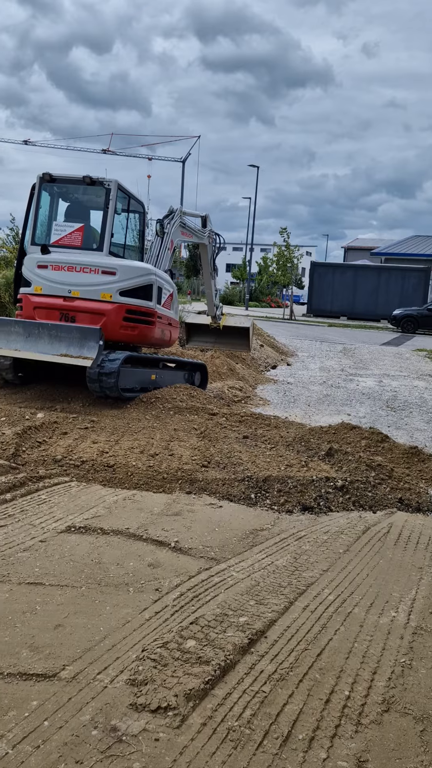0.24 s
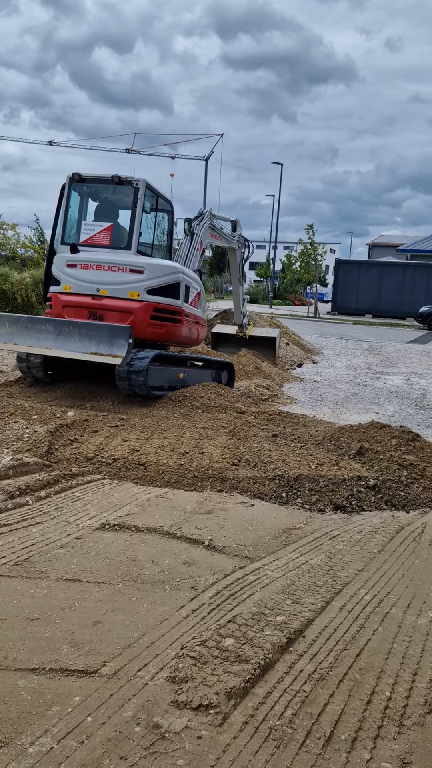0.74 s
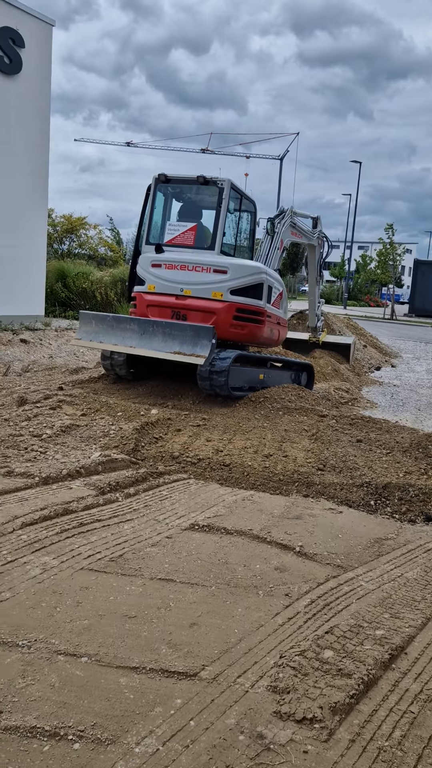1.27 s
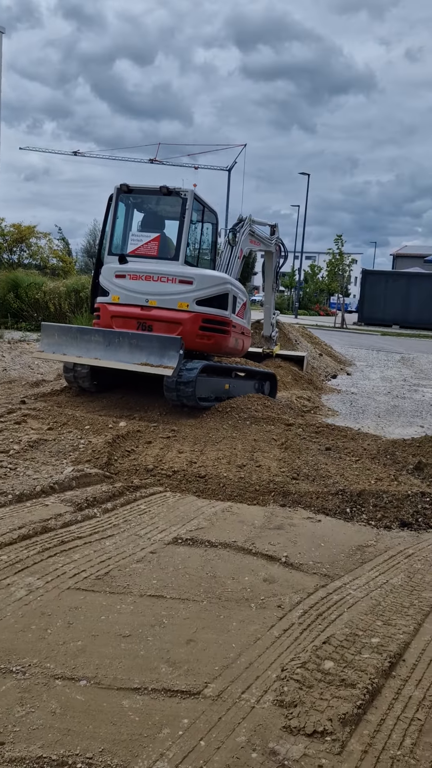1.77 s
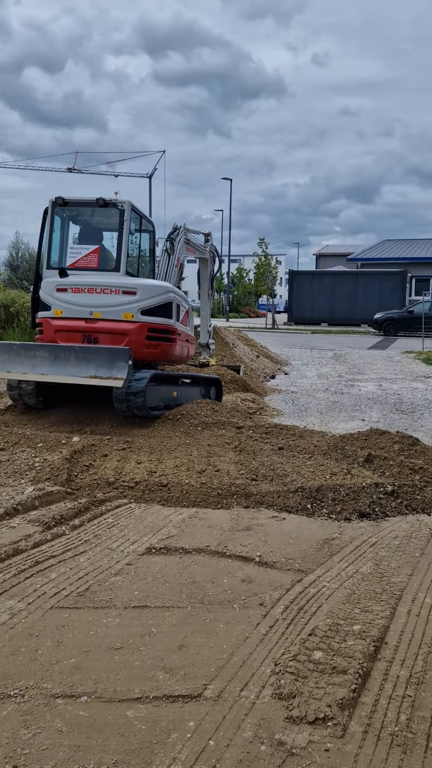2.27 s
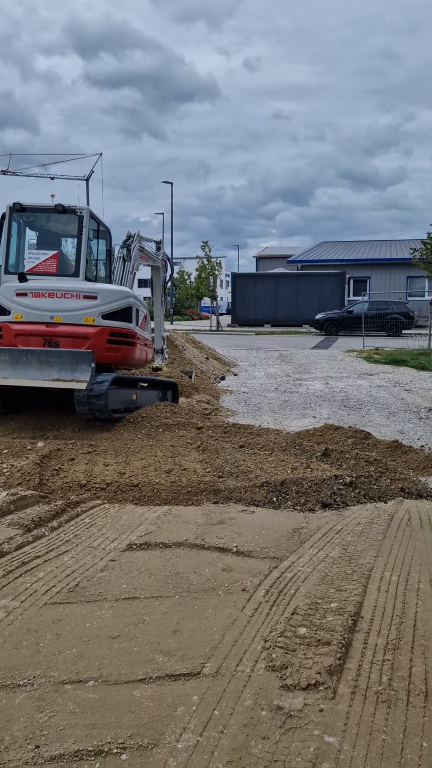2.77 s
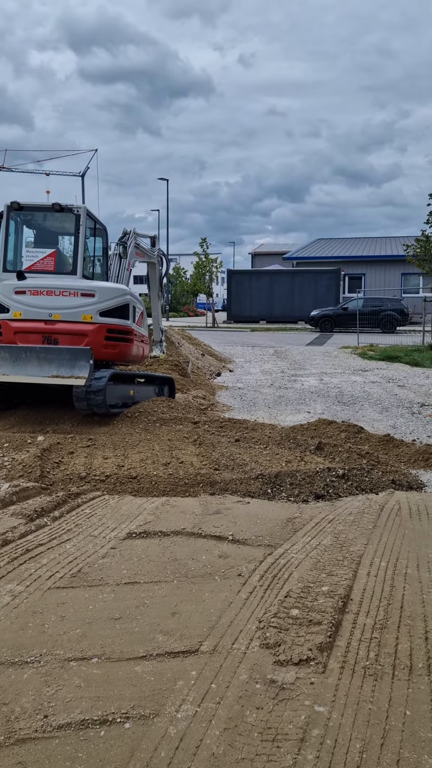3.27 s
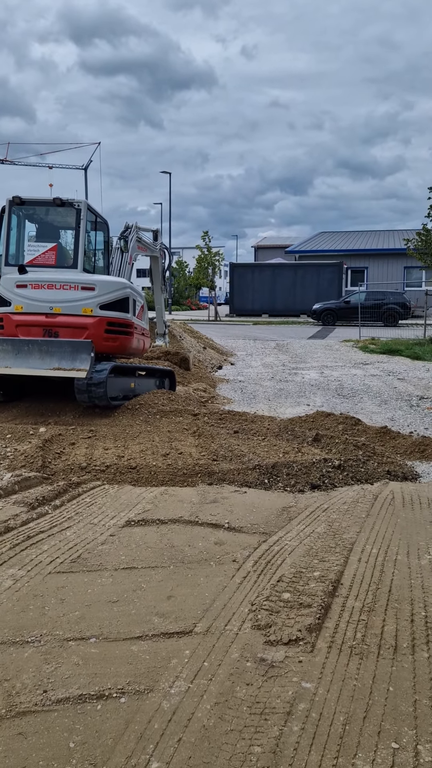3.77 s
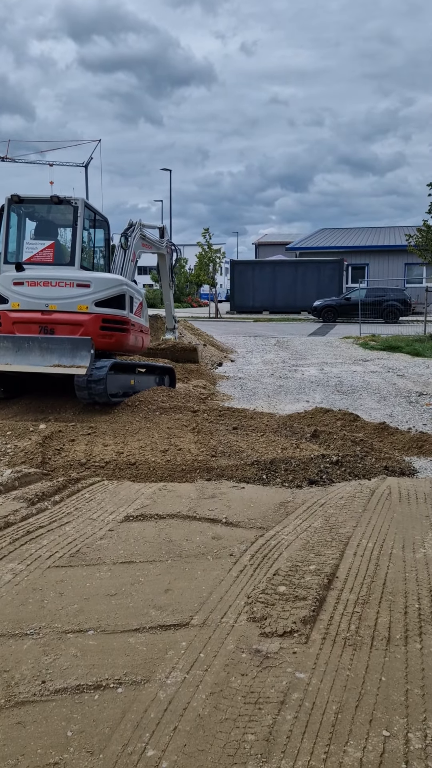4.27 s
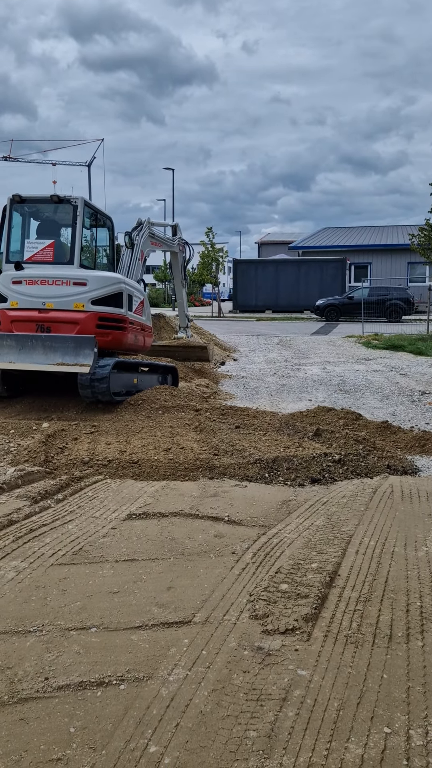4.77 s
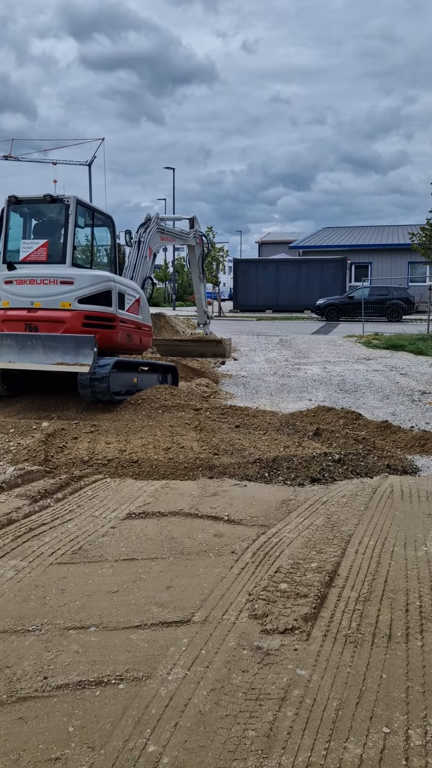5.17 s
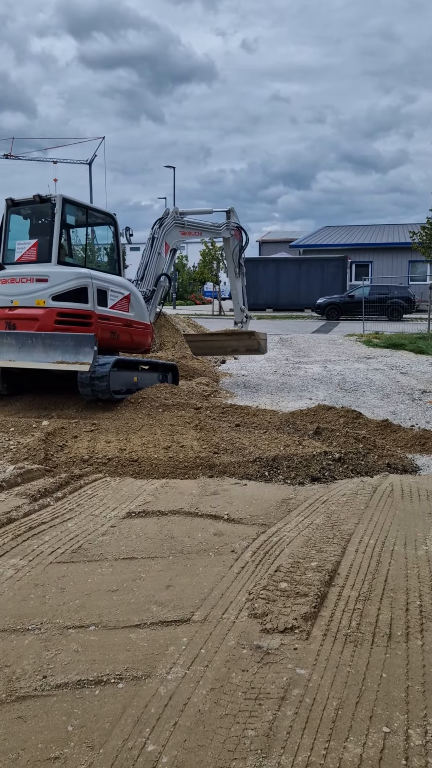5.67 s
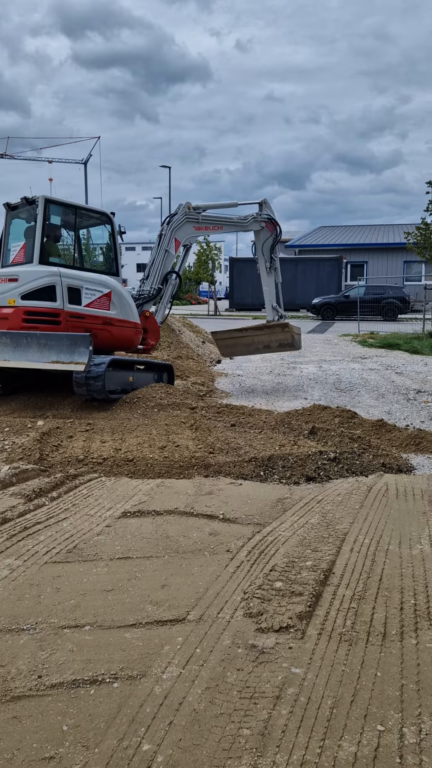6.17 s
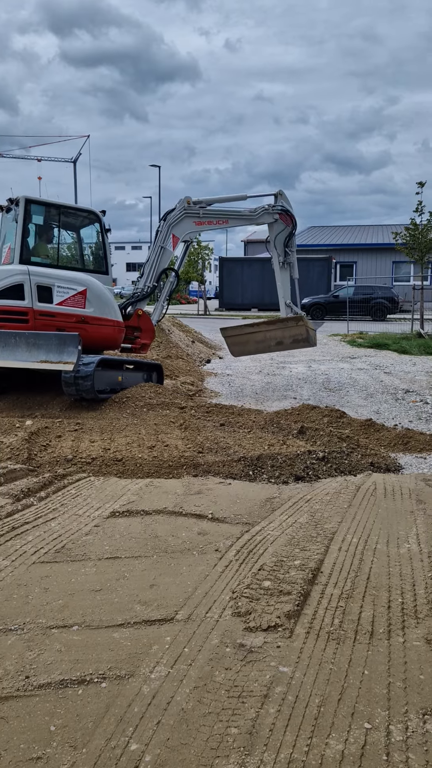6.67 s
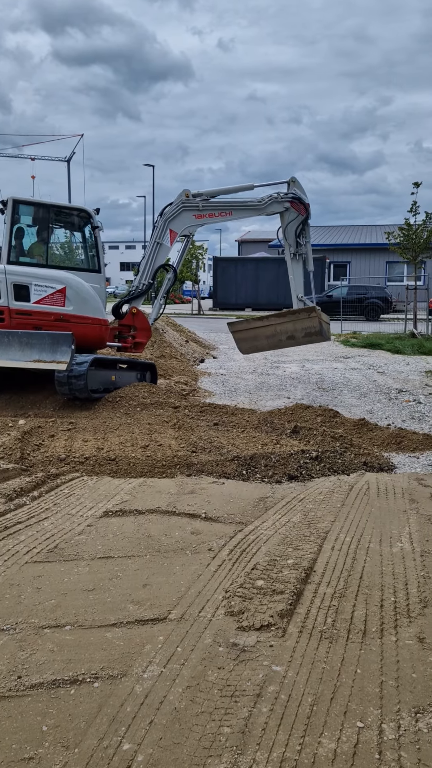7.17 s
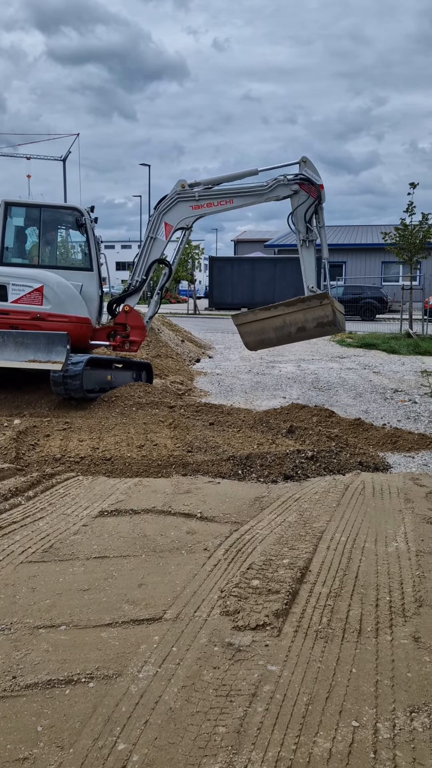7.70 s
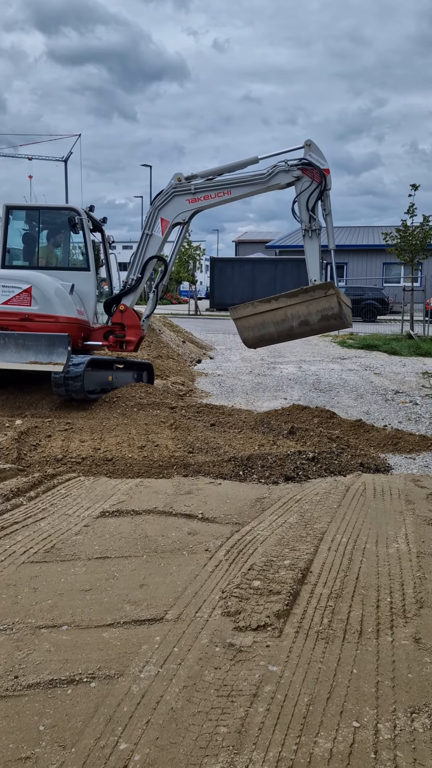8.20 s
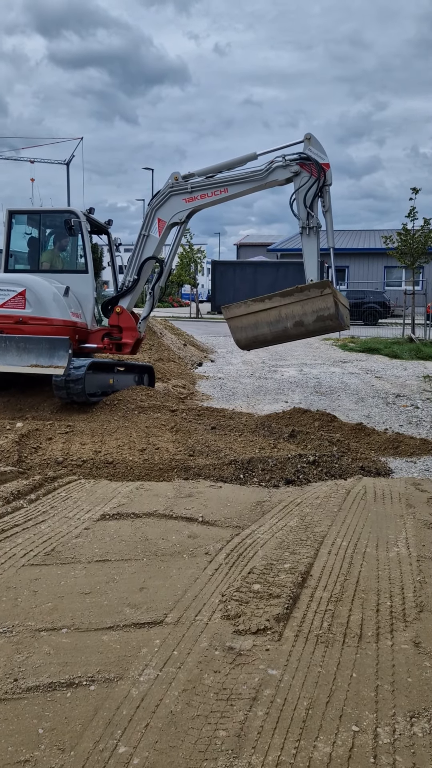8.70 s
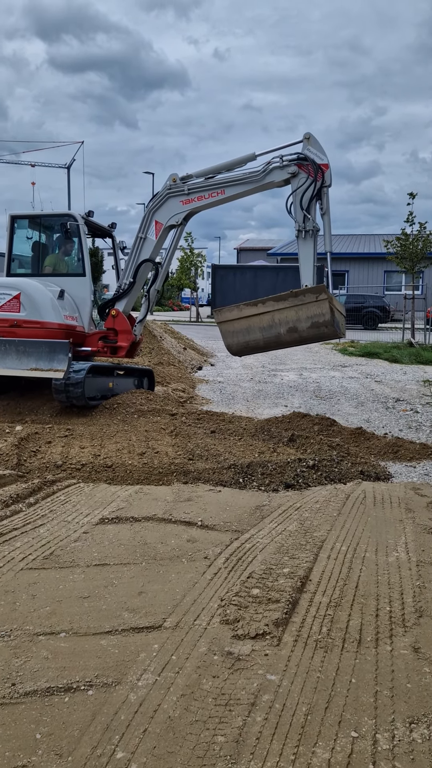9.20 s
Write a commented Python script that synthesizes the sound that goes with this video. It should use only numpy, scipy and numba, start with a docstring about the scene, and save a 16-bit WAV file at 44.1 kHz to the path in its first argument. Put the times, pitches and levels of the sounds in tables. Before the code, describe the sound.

Continuous low diesel drone with dense mechanical clatter and airy hiss, picked up outdoors by a nearby phone. During the first half the boom wavers and drops out briefly while the arm digs, with grinding, gritty rustle, soft thuds and gusts at the microphone. One damped metallic knock ends the digging. Then the boom runs smoother with panel hum and hydraulic hiss as the loaded bucket lifts and swings, growing a little duller at the end.

```python
"""The exhaust boom of a mini excavator's diesel fades and swells throughout, a few metres from a phone on a building site.
Tones locked to the four-cylinder firing count make boom, panel hum and fan; noise pulsed by it makes rumble and clatter.
Oil hisses in narrow noise bands, sandy noise grains rustle, and decaying modes ring in one bucket knock.
The engine bay grows duller and quieter as the machine slews away near the end; low noise buffets the two microphone ports as wind."""
import sys
import numpy as np
from scipy import signal
from scipy.fft import rfft, irfft, next_fast_len
from scipy.io import wavfile
from scipy.ndimage import uniform_filter1d
from numba import njit

SR = 44100
rng = np.random.default_rng(int(sys.argv[2]) if len(sys.argv) > 2 else 0)


def bounce(signal):
    """Save signal as a 16-bit WAV file at the path given by the first command-line argument."""
    frames = np.transpose(np.atleast_2d(signal))
    limited = np.clip(frames, -1, 1)
    pcm = np.round(limited * 32767).astype(np.int16)
    wavfile.write(sys.argv[1], SR, pcm)


N = 416744
TIME = np.arange(N) / SR
FFT_SIZE = next_fast_len(N + 4096, real=True)
FREQS = np.fft.rfftfreq(FFT_SIZE, 1 / SR) + 1e-3  # the offset keeps log(0) away


def undb(db):
    """Decibels to gain."""
    return 10 ** (np.asarray(db) / 20)


def curves(table):
    """The columns of a control table at every sample."""
    s, *columns = np.transpose(table)
    return [np.interp(TIME, s, c) for c in columns]


def across(table):
    """The columns of a frequency table at every frequency, on a log axis."""
    hz, *columns = np.transpose(table)
    return [np.interp(np.log(FREQS), np.log(hz), c) for c in columns]


def unit(x):
    """Scale so that the centre of the channels has rms 1."""
    return x / np.std(np.atleast_2d(x).mean(axis=0))


def filtered(x, gain):
    """Apply a gain that is given at every frequency."""
    return irfft(rfft(x, FFT_SIZE) * gain, FFT_SIZE)[..., :N]


def colour(x, points):
    """Filter through a spectrum that falls away steeply beyond its ends, to rms 1."""
    low_skirt = 1 / (1 + (points[0][0] / FREQS) ** 8)
    high_skirt = 1 / (1 + (FREQS / points[-1][0] / 1.2) ** 16)
    return unit(filtered(x, undb(across(points)[0]) * low_skirt * high_skirt))


def band(x, hz, width_hz):
    """One fixed resonance, at rms 1."""
    return unit(filtered(x, 1 / (1 + ((FREQS - hz) / width_hz * 2) ** 2)))


@njit
def resonance(x, hz, width):
    """State-variable band-pass with a moving centre; hz and width in Hz."""
    y, b, l = np.empty(len(x)), 0., 0.
    for i in range(len(x)):
        g, k = np.tan(np.pi * hz[i] / SR), width / hz[i]
        v = (b + g * (x[i] - l)) / (1 + g * (g + k))
        b, l, y[i] = 2 * v - b, l + 2 * g * v, k * v
    return y


def tone(turns):
    """A sine of rms 1."""
    return np.sqrt(2) * np.cos(2 * np.pi * turns)


def walk(rate):
    """Slow chance of rms 1: random levels held 1 / rate s and slewed twice."""
    hold = int(SR / rate)
    steps = np.repeat(rng.standard_normal(N // hold + 1), hold)
    return unit(uniform_filter1d(uniform_filter1d(steps, hold), hold)[:N])


def swell(start, end):
    """A smooth rise from 0 to 1 and back between two times."""
    return np.sin(np.pi * np.clip((TIME - start) / (end - start), 0, 1))


def swells(table, length_s):
    """Equally long swells, each centred on its time and with its own level."""
    return sum(undb(db) * swell(s - length_s / 2, s + length_s / 2) ** 2 for s, db in table)


def strikes(table, decay_s):
    """An envelope that jumps at each event and dies away."""
    return sum(undb(db) * (TIME >= s) * np.exp(-np.abs(TIME - s) / decay_s) for s, db in table)


# the phone's two microphone ports: f/Hz, left minus right level/dB, coherence [0-1], left lead [radians]
PORT_PAIR = [(100, 1.2, 0.99, -0.1), (170, 1.2, 0.98, -0.1), (310, 0.4, 0.87, 0.2), (500, 3.3, 0.69, 0.6),
             (750, 2.7, 0.91, -0.4), (1050, 1.4, 0.32, 1.0), (1450, 2.4, 0.43, -0.1),
             (1900, 0.2, 0.59, 0.9), (2600, 1.5, 0.63, 1.7), (3800, 5.6, 0.31, 4.1), (4900, -0.2, 0.3, 7.0),
             (6800, 9.0, 0.14, 8.8), (8700, 13.0, 0.17, 9.2), (12500, 5.2, 0.01, 9.8)]


def at_ports(pair):
    """Two unrelated signals become left and right: a shared direct part that leads left, and a diffuse part."""
    pan_db, likeness, lead = across(PORT_PAIR)
    likeness = np.clip(likeness, 0, .999)
    direct, diffuse = rfft(pair, FFT_SIZE)
    left = undb(pan_db)
    right = (likeness * direct + np.sqrt(1 - likeness ** 2) * diffuse) * np.exp(-1j * lead)
    # the power of the two ports' mean stays even at every frequency
    centre = np.sqrt(left ** 2 + 1 + 2 * left * likeness * np.cos(lead)) / 2
    return irfft(np.array([left * direct, right]) / centre, FFT_SIZE)[:, :N]


def noise(gate=1):
    """Gated turbulence as the two ports pick it up."""
    return at_ports(gate * rng.standard_normal((2, N)))


def place(x):
    """A point source reaches both ports directly, with a level step and a lead between them."""
    pan_db, _, lead = across(PORT_PAIR)
    half = undb(pan_db / 2) * np.exp(.5j * lead)
    return filtered(x, np.array([half, 1 / half]))


# nearby surfaces: mean extra path [s], reflected share [0-1]
SURFACES = [(.0023, 0.14), (.0052, .17), (.011, .15)]


def reflected(pair):
    """Ground and bodywork add short echoes whose delays drift at random."""
    out = pair
    for delay_s, share in SURFACES:
        lag = (SR * delay_s * (1 + .03 * walk(.6))).astype(int)
        out = out + share * pair[:, (np.arange(N) - lag) % N]
    return unit(out)


GOVERNED_HZ = 81.0  # firings per second away from the sags
# the engine sags under a new load: start t/s, end t/s, depth f/Hz
LOAD_SAGS = [(0.6, 1.1, .9), (1.85, 2.6, .45), (4.5, 5.15, .85)]


def count_firings():
    """The firing rate, dipping under load, adds up to a running count of firings."""
    firing_hz = GOVERNED_HZ - sum(depth * swell(start, end) for start, end, depth in LOAD_SAGS)
    return np.cumsum(firing_hz) / SR


# working strokes of the arm: start t/s, end t/s, effort [0-1]
ARM_STROKES = [(0.6, 1.7, .85), (3.7, 4.547, 1.0), (6.2, 7.9, 0.06)]


def effort():
    """How hard the arm works, 0-1."""
    return sum(strength * swell(start, end) for start, end, strength in ARM_STROKES)


# the body turns and screens the engine bay: t/s, share turned away [0-1]
SLEW_AWAY = [(7.65, 0), (8.0, .65), (8.6, 0.62), (9.45, 1.0)]


def turned_away():
    """How far the body has turned away from the phone, 0-1."""
    return curves(SLEW_AWAY)[0]


# the low boom fades: start t/s, end t/s, fade level/dB (spans shorter than the ramp fade less)
BOOM_FADES = [(0.473, 0.715, 5.5), (0.575, 0.607, 12), (2.024, 2.489, 14), (2.75, 2.833, 8.5),
              (3.778, 3.84, 2.5), (4.42, 4.453, 7)]
FADE_RAMP_S = 0.043


def faded_db():
    """How far the low boom has faded: a quick fall, a hold and a quick return."""
    fade_db = 0
    for start, end, db in BOOM_FADES:
        inside_s = np.minimum(TIME - start, end - TIME)
        fade_db = fade_db + db * np.clip(.5 + inside_s / FADE_RAMP_S, 0, 1)
    return fade_db


# exhaust boom at the firing rate, before fades and flutter: t/s, level/dB
BOOM_LEVEL = [(0, -19.5), (0.45, -20), (0.85, -14.5), (1.13, -19.5), (1.95, -14), (2.6, -19), (3.1, -13),
              (3.6, -15.5), (3.95, -19), (4.08, -15.5), (4.6, -17), (4.69, -12), (5.8, -13.5), (8.3, -13.4),
              (9.45, -15)]
# its octave, before fades, throb and flutter: t/s, level/dB
OCTAVE_LEVEL = [(0, -36), (1.5, -26.5), (3.15, -21.5), (4.8, -27), (5.2, -23.5), (5.65, -24), (6.5, -33),
                (8.05, -26.5), (9.45, -29)]
# spectrum of the gas rumble: f/Hz, relative level/dB
RUMBLE_SPECTRUM = [(60, -20), (80, 0), (105, 2.5), (140, -4.5), (190, -6), (240, -13.5), (290, -10.5),
                   (360, -15.5), (450, -19.5), (560, -22.5), (900, -48)]
DIGGING_ENDS_S, DIGGING_FLUTTER_DB, FREE_FLUTTER_DB = 4.65, 1.5, 0.73
OCTAVE_FADE, RUMBLE_FADE = .3, 0.42  # shares of the boom's fade
RUMBLE_DB, RUMBLE_EFFORT_DB, RUMBLE_SCREEN_DB = -27.5, 1.5, 0.6  # base, full effort adds, turning takes
RUMBLE_LAG_S = 0.4


def exhaust(firings):
    """The silencer rounds the firings to a boom and its octave; each puff of gas rumbles."""
    fade_db = faded_db()
    flutter_db = np.where(TIME < DIGGING_ENDS_S, DIGGING_FLUTTER_DB, FREE_FLUTTER_DB)
    boom = tone(firings) * undb(curves(BOOM_LEVEL)[0] - fade_db + flutter_db * walk(28))
    # the octave trails the boom (broad crests, narrow troughs) and throbs once per engine cycle
    throb_db = 0.83 * tone(firings / 4) + .6 * walk(15)
    octave_db = curves(OCTAVE_LEVEL)[0] - OCTAVE_FADE * fade_db + throb_db
    octave = tone(2 * firings - .39) * undb(octave_db)
    # the rumble follows the fade sluggishly
    lag = int(RUMBLE_LAG_S * SR)
    slow_fade_db = uniform_filter1d(fade_db, lag, origin=lag // 3)
    rumble_db = RUMBLE_DB + RUMBLE_EFFORT_DB * effort() ** 2
    rumble_db = rumble_db - RUMBLE_FADE * slow_fade_db - RUMBLE_SCREEN_DB * turned_away()
    rumble = colour(noise(1 + 0.19 * tone(firings)), RUMBLE_SPECTRUM) * undb(rumble_db)
    return place(boom + octave) + rumble


# low engine lines, before fades and waver: multiple of the firing rate, level/dB (rms)
LOW_LINES = [(.75, -50), (1.25, -36.5), (2.25, -42), (2.5, -45), (3, -51.5), (4, -52.5)]
# harmonics that the panels sing with: multiple of the firing rate, level/dB relative to PANEL_DB
SINGING_PANELS = [(10, 2.5), (11, 0.5), (13, 3), (14, -6.5), (15, 3), (25, 1.5)]
# a body panel hums along for a while: start t/s, end t/s, multiple of the firing rate, crest level/dB
PANEL_HUMS = [(1.05, 2.1, 3, -39), (2.4, 4.5, 3, -46), (1.0, 2.0, 10, -48), (2.302, 3.5, 10, -41),
              (4.3, 6.3, 2.5, -41), (6.048, 6.8, 5, -37.5)]
PANEL_DB, FIFTH_DB, FIFTH_AFTER_DIGGING_DB = -54, -52, -48


def engine_lines(firings):
    """Unequal cylinders and humming panels add lines, all on the grid of the four-firing cycle."""
    def on_grid(k):
        return np.round(4 * k) / 4 * firings

    def line(k, db, waver_db):
        return tone(on_grid(k) + .05 * walk(4)) * undb(db + waver_db * walk(2.5))

    low = sum(line(k, db, waver_db=1.5) for k, db in LOW_LINES) * undb(-.6 * faded_db())
    panels = sum(line(k, PANEL_DB + db, waver_db=2.5) for k, db in SINGING_PANELS)
    # the fifth harmonic comes forward over the last half second of digging
    fifth_db = np.interp(TIME, [DIGGING_ENDS_S - .5, DIGGING_ENDS_S], [FIFTH_DB, FIFTH_AFTER_DIGGING_DB])
    fifth = line(5, fifth_db, waver_db=-0.5)
    # a resonating panel moves a quarter cycle behind its drive
    hums = sum(tone(on_grid(k) - 1 / 4) * undb(db) * swell(start, end) for start, end, k, db in PANEL_HUMS)
    return place(low + fifth + panels + hums)


# cooling fan, before flutter: t/s, blade tone level/dB, its octave level/dB
FAN_LEVELS = [(0, -42.5, -44), (0.6, -39.5, -40.5), (1.8, -44.5, -42.5), (3.1, -42.5, -39.5),
              (4.7, -46.5, -44), (5.4, -44, -38), (6.4, -40, -45), (7.7, -46.5, -39), (8.5, -57, -36),
              (9.45, -54, -42)]
BLADES_PER_FIRING = 4.535


def fan(firings):
    """The belt-driven fan sounds its blade rate and two overtones, fluttering in the uneven air."""
    blade_db, octave_db = curves(FAN_LEVELS)
    blades = BLADES_PER_FIRING * firings
    tones = 0
    for harmonic, db in enumerate([blade_db, octave_db, blade_db - 5.5], start=1):
        tones = tones + tone(harmonic * blades + 0.027 * walk(10)) * undb(db + 2.0 * walk(7))
    return place(tones)


def blows(firings, decay, scatter_db):
    """One burst a firing, fading over a share of the firing interval; cylinders differ and every firing varies."""
    count = np.floor(firings).astype(int)
    cylinder_db = np.array([1.2, -1.5, -0.83, 0.27])
    chance_db = scatter_db * rng.standard_normal(count.max() + 1)
    size = undb(cylinder_db[count % 4] + chance_db[count])
    return size * np.exp(-(firings % 1) / decay)


# spectrum of the block's clatter: f/Hz, relative level/dB
CLATTER_SPECTRUM = [(600, -17), (900, -6), (1020, -3), (1120, -0.5), (1250, 0), (1500, 1.5), (1760, -3),
                    (2030, 1), (2250, -2.5), (2500, -5.5), (2900, -11.5), (3300, -18), (4200, -34)]
# spectrum of the injector and oil hiss: f/Hz, relative level/dB
HISS_SPECTRUM = [(1800, -12), (2900, -5.5), (3400, -2.5), (3900, -3.5), (4400, 0.5), (5000, -.5),
                 (5800, -4.5), (6250, -4), (6900, -7), (7400, -5), (8000, -11), (8700, -22.5), (11000, -43)]
# moving peak of the engine noise, coloured by ground reflection: t/s, f/Hz
MOVING_PEAK = [(0, 670), (1.8, 652), (2.5, 701), (5.5, 698), (6.9, 700), (7.7, 743), (9.45, 760)]
# base level, what full effort adds, what turning away takes
CLATTER_DB, CLATTER_EFFORT_DB, CLATTER_SCREEN_DB = -34.5, 2.1, 2.5
HISS_DB, HISS_EFFORT_DB, HISS_SCREEN_DB = -41.5, 2.1, 4
PEAK_DB, PEAK_EFFORT_DB, PEAK_SCREEN_DB = -34.5, 1.2, 7.5


def engine_bay(firings):
    """The block rattles, injectors and oil hiss, and broad engine noise has a moving peak from ground reflection."""
    work, turned, peak_hz = effort(), turned_away(), curves(MOVING_PEAK)[0]
    clatter_db = CLATTER_DB + CLATTER_EFFORT_DB * work - CLATTER_SCREEN_DB * turned
    hiss_db = HISS_DB + HISS_EFFORT_DB * work - HISS_SCREEN_DB * turned ** 2
    peak_db = PEAK_DB + PEAK_EFFORT_DB * work - PEAK_SCREEN_DB * turned ** 3
    rattle = noise(2.5 + blows(firings, decay=0.31, scatter_db=1.5))
    clatter = colour(reflected(rattle), CLATTER_SPECTRUM) * undb(clatter_db + .2 * walk(14))
    spray = noise(3.5 + blows(firings, decay=0.22, scatter_db=4.5))
    hiss = colour(reflected(spray), HISS_SPECTRUM) * undb(hiss_db + 0.41 * walk(12))
    broad = noise(1 + 0.032 * tone(firings / 4))
    peak = np.array([resonance(resonance(side, peak_hz, 260.), peak_hz, 317.0) for side in broad])
    return clatter + hiss + unit(peak) * undb(peak_db)


# spectrum of the sand: f/Hz, relative level/dB
GRIT_SPECTRUM = [(2500, -7), (5000, 1), (8500, 0.5), (10300, 1.5), (12000, 1), (15500, -1)]
# spills of grit off the bucket: t/s, crest level/dB
GRIT_SPILLS = [(1.39, -51), (2.01, -52), (2.53, -55), (2.94, -54), (3.27, -49), (3.81, -52), (3.98, -49.5),
               (4.31, -53)]
# stones ticking on the steel: t/s, onset level/dB
STONE_TICKS = [(1.4037, -44), (2.6938, -48), (3.8232, -46), (3.99, -44), (4.335, -42), (7.888, -50)]
SAND_DB, SAND_EFFORT_DB, SPILL_S = -52.5, 2.5, .12
SAND_THINS_S, SAND_FADE_DB_PER_S = 6.05, 2


def soil():
    """Dense grains of sand rustle with each stroke and fade once the bucket is lifted; some stones tick."""
    # each grain lasts 32 samples
    grain_db = 2.2 * np.minimum(rng.exponential(size=N // 32 + 1), 5)
    grains = undb(grain_db).repeat(32)[:N]
    fade_db = SAND_FADE_DB_PER_S * np.maximum(TIME - SAND_THINS_S, 0)
    flow = undb(SAND_DB + SAND_EFFORT_DB * effort() - fade_db)
    level = np.hypot(flow, swells(GRIT_SPILLS, SPILL_S)) * undb(0.77 * walk(25))
    sand = colour(reflected(noise(3.6 + grains)), GRIT_SPECTRUM) * level
    tick_spectrum = [(2000, -10), (4500, 0), (8000, -11), (15000, -19)]  # f/Hz, level/dB
    ticks = colour(noise(), tick_spectrum) * strikes(STONE_TICKS, decay_s=.012)
    return sand + ticks


# spectrum of the wind at the ports: f/Hz, relative level/dB
WIND_SPECTRUM = [(12, -10), (25, -8.5), (45, 0.5), (70, 1), (120, -6), (250, -24), (600, -48)]
# gusts on the ports, before flutter: t/s, crest level/dB
WIND_GUSTS = [(0.82, -30), (1.15, -26), (1.37, -19.5), (1.98, -31), (2.73, -29), (3.33, -32), (3.68, -23),
              (3.92, -29), (4.22, -25), (6.8, -31), (7.2, -34), (7.6, -36), (8.33, -36), (8.57, -25),
              (9.25, -24)]
BREEZE_DB, GUST_S = -38, 0.39


def wind():
    """A light breeze and its gusts push eddies on the phone, partly on each port alone."""
    eddies = rng.standard_normal(N) + .5 * rng.standard_normal((2, N))
    strength = np.hypot(undb(BREEZE_DB), swells(WIND_GUSTS, GUST_S))
    return colour(eddies, WIND_SPECTRUM) * strength * undb(1.5 * walk(14))


# oil squeezed through the control valves: start t/s, end t/s, centre f/Hz, width f/Hz, crest level/dB
OIL_VALVES = [(0.091, 3.0, 2750, 900, -45.5), (0.748, 2.4, 2120, 230, -42.5), (1.17, 1.29, 645, 30, -36),
              (1.62, 1.77, 638, 18, -32), (4, 4.5, 2000, 150, -40.5), (3.8, 4.55, 5000, 700, -50),
              (4.998, 6.3, 9400, 600, -65), (5, 6.8, 7700, 700, -55), (4.9, 7.8, 2400, 600, -45.5),
              (5.298, 9.1, 4900, 960, -47.5), (5.798, 7.6, 6130, 260, -54.5), (6.5, 7.3, 690, 40, -39.5),
              (6.7, 8, 1320, 310, -41.5)]


def hydraulics():
    """Oil turbulence in each valve hisses in its own narrow band, swelling and fading."""
    oil = noise()
    hiss = 0
    for start, end, hz, width_hz, db in OIL_VALVES:
        hiss = hiss + band(oil, hz, width_hz) * undb(db) * np.sqrt(swell(start, end))
    return hiss


# dull thuds: t/s, onset level/dB
DULL_THUDS = [(.782, -27), (1.98, -21.5), (3.635, -23)]
# the bucket grinds through packed soil and the arm drones: start t/s, end t/s, crest level/dB
SOIL_GRINDS = [(1.3, 2.1, -39), (3.1, 5.1, -35.5)]
ARM_HZ, ARM_WIDTH_HZ = 308, 140
# bucket knock: t/s, level/dB of its strongest mode before decay
BUCKET_KNOCKS = [(4.405, -11)]
# modes of the knock: f/Hz, relative level/dB, t60 [s]
KNOCK_MODES = [(668, 0, .018), (830, -11, .015), (1841, -17, .03), (2649, -16, .03)]


def bucket():
    """Dull thuds, the drone of grinding, and a short knock, cushioned and damped by the load of soil."""
    thud_spectrum = [(70, 1), (130, -4.0), (280, -4), (500, -25)]  # f/Hz, level/dB
    thuds = colour(noise(), thud_spectrum) * strikes(DULL_THUDS, decay_s=0.057)
    grind_level = sum(undb(db) * swell(start, end) for start, end, db in SOIL_GRINDS)
    grinding = band(noise(), ARM_HZ, ARM_WIDTH_HZ) * grind_level
    knock = 0
    for s, peak_db in BUCKET_KNOCKS:
        age = np.maximum(TIME - s, 0)
        contact = np.minimum(age / .0012, 1)  # soft onset over 1.2 ms
        for hz, db, t60 in KNOCK_MODES:
            ringing = undb(peak_db + db - 60 * age / t60) * np.sin(2 * np.pi * hz * age)
            knock = knock + contact * ringing
    return place(knock) + thuds + grinding


def scene():
    """The firing count times every part of the engine; arm, soil and wind join it at the phone."""
    firings = count_firings()
    engine = exhaust(firings) + engine_lines(firings) + fan(firings) + engine_bay(firings)
    return engine + soil() + wind() + hydraulics() + bucket()


TOP_HZ = 15650


def record(dry):
    """The phone cuts the top with a steep elliptic low-pass."""
    return signal.sosfilt(signal.ellip(10, .2, 80, TOP_HZ, fs=SR, output="sos"), dry)


dry = scene()
out = record(dry)
bounce(out)
```